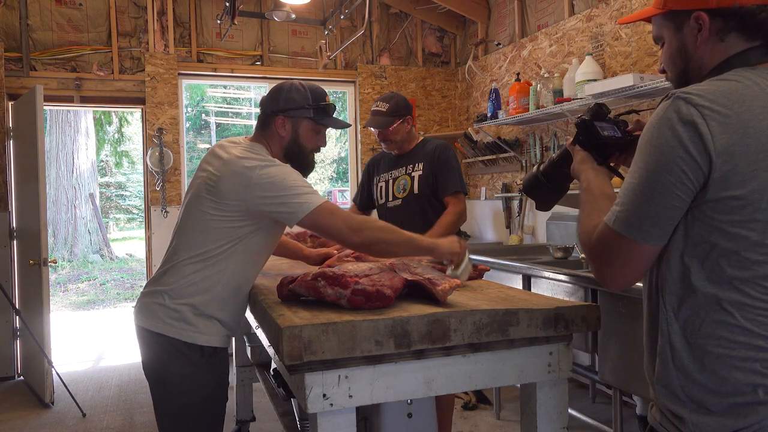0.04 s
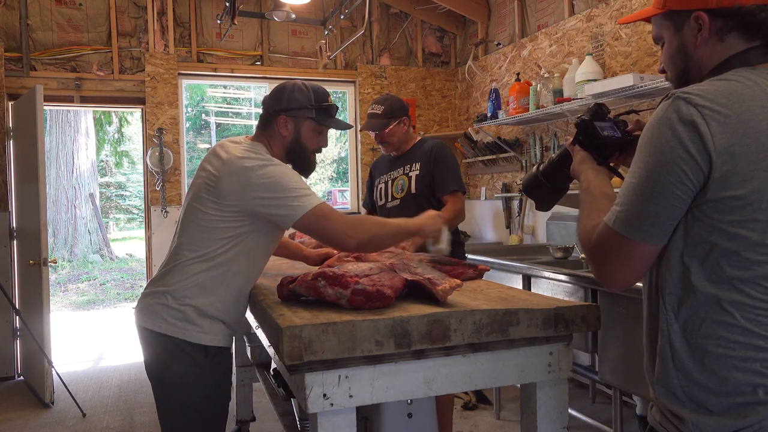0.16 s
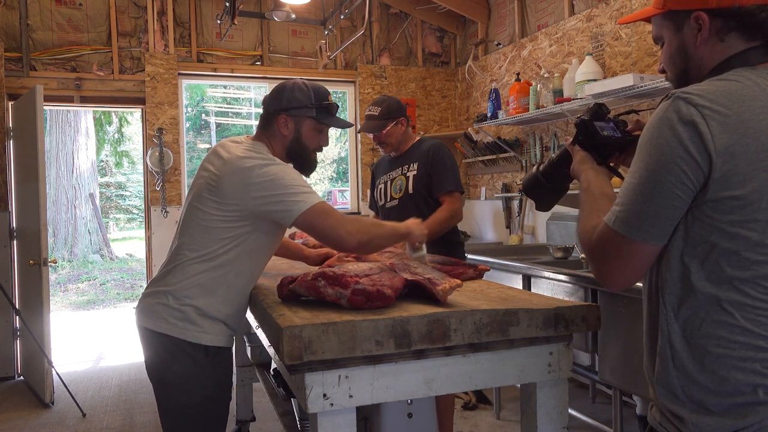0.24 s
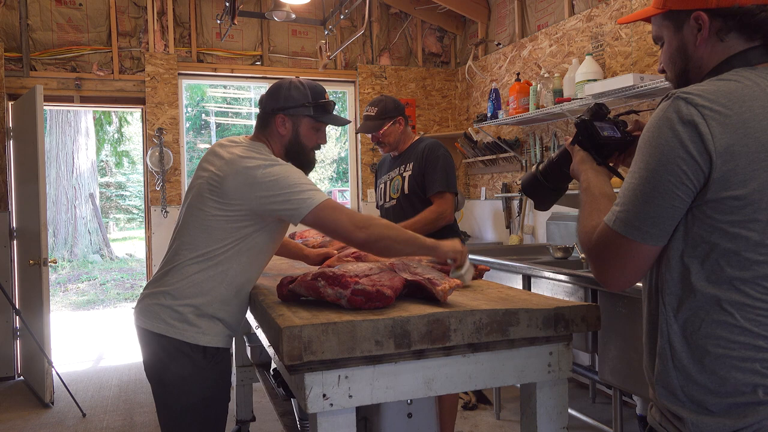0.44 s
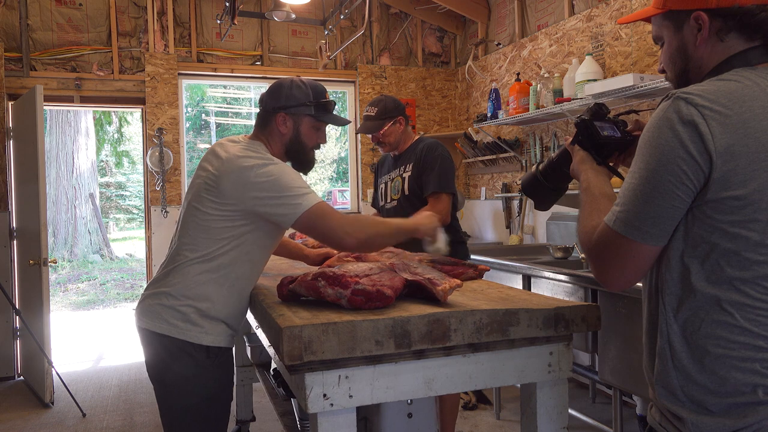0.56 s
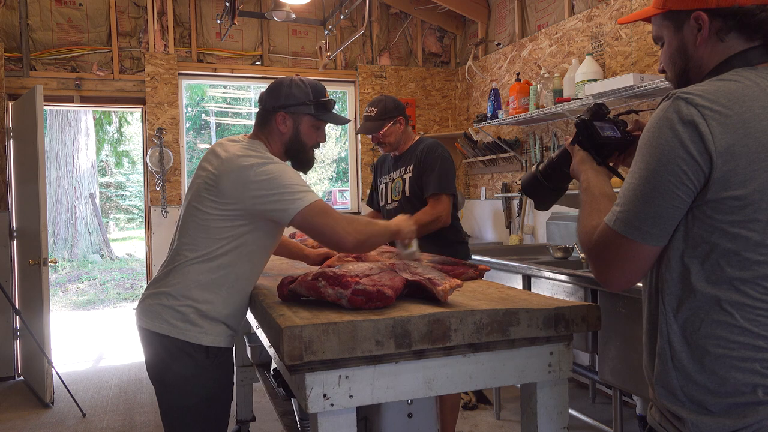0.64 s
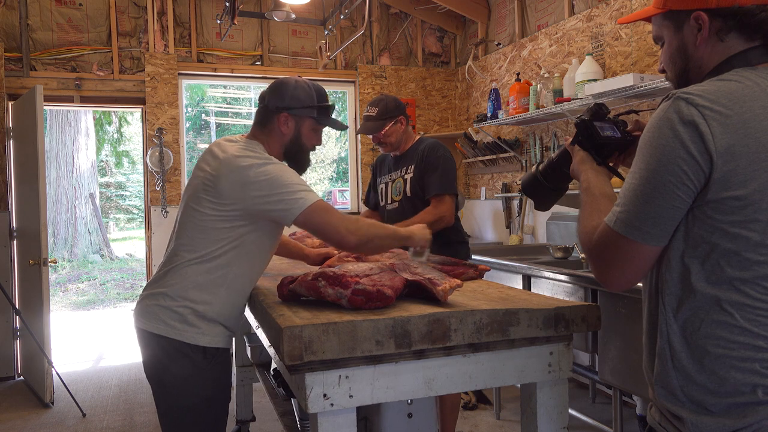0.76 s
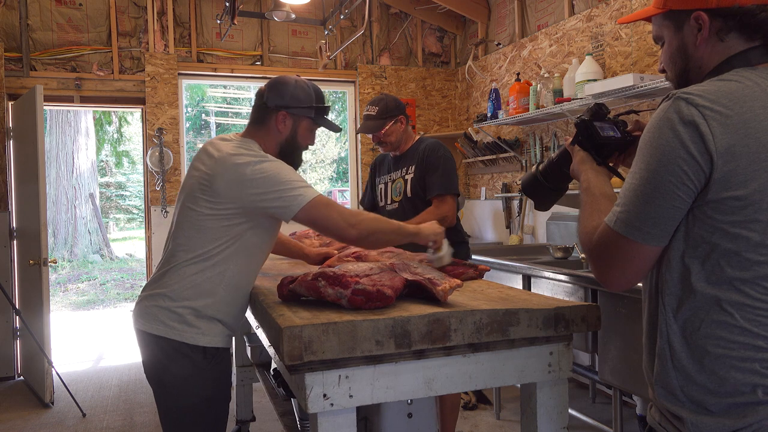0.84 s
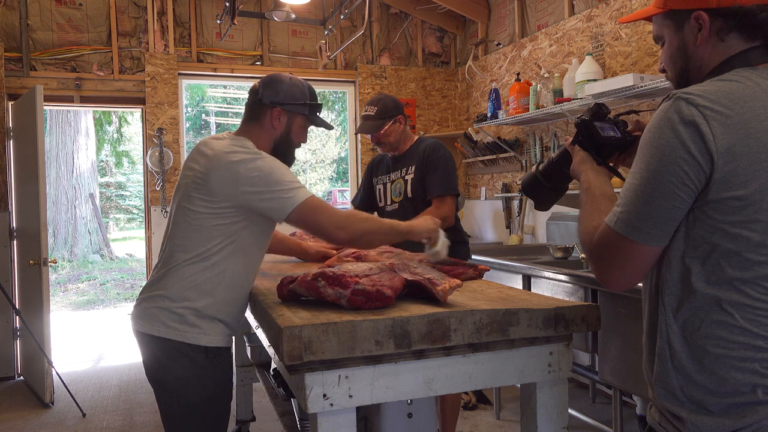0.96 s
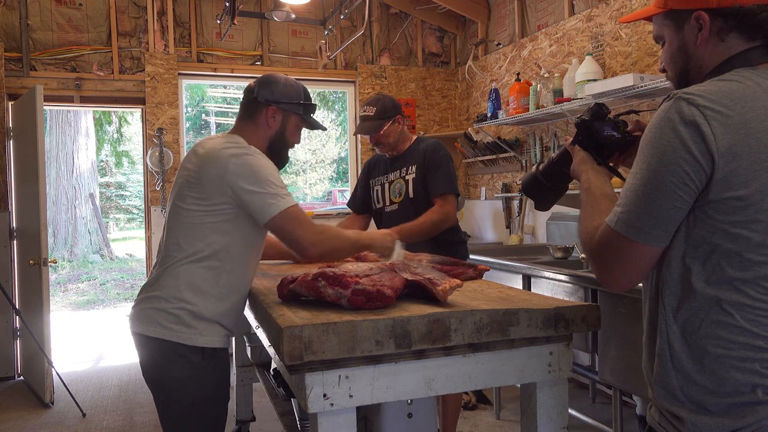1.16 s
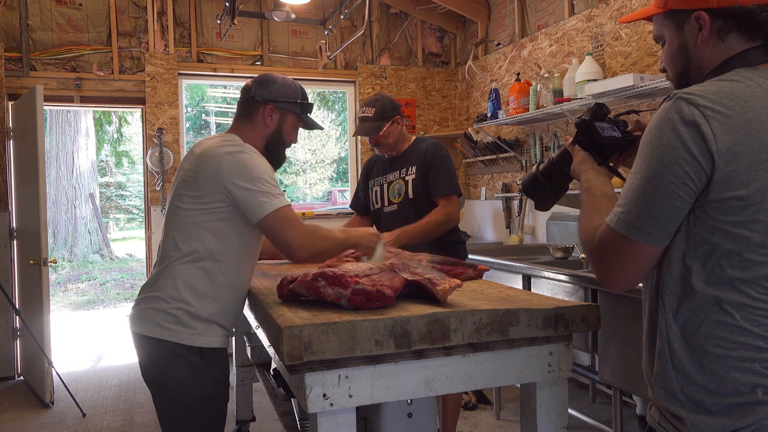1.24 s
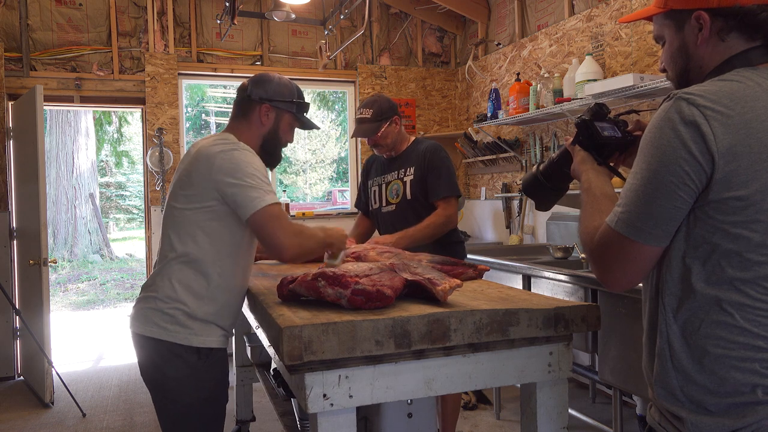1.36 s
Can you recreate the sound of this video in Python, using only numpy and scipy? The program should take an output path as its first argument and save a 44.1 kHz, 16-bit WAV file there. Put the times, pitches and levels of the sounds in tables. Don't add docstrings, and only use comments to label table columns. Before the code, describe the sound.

Hard wooden knocks hit a thick block early, loudest at a third of a second, with softer taps near the end; faint dry bristle strokes between, low cooler hum, small wooden room, microphone a few steps away.

```python
import sys
import numpy as np
from scipy import signal
from scipy.fft import rfft, irfft, next_fast_len
from scipy.io import wavfile
from scipy.ndimage import uniform_filter1d

SR = 44100
rng = np.random.default_rng(int(sys.argv[2]) if len(sys.argv) > 2 else 0)


def gain_from_db(level_db):
    decades = np.asarray(level_db, float) / 20
    return 10 ** decades


def unload_wav(signal):
    wavfile.write(
        sys.argv[1],
        SR,
        np.round(np.clip(np.atleast_2d(signal).T, -1, 1) * 32767).astype(np.int16),
    )


N = 61739
SIZE = next_fast_len(N)


def unit(x):
    return x / np.sqrt(np.mean(x ** 2))


def across(table, hz):
    f, value = np.array(table).T
    return np.interp(np.log(hz + 1), np.log(f), value)


def colour(x, table):
    hz = np.arange(SIZE // 2 + 1) * SR / SIZE
    gain = gain_from_db(across(table, hz)) * np.minimum(hz / table[0][0], 1) ** 2
    return irfft(rfft(x, SIZE) * gain, SIZE)[:N]


def walk(rate_hz):
    hold = int(SR / rate_hz)
    steps = np.repeat(rng.standard_normal(N // hold + 1), hold)
    return 1.7 * uniform_filter1d(uniform_filter1d(steps, hold), hold)[:N]


def bands(count):
    f = np.arange(SIZE // 2 + 1) * SR / SIZE + 1
    out = []
    for hz in 60 * 2 ** (np.arange(count) / 3):
        phase = 2j * np.pi * rng.random(len(f))
        out.append((hz, irfft(np.exp(phase - (3 * np.log2(f / hz)) ** 2), SIZE)[:N]))
    return out


def bristles():
    flicks_per_s, flick_spread_db, slide_db, chatter_db, chatter_hz = 5000, 2, 0.5, 1, 120
    when, sign, size = rng.random(size=(3, N))
    flicks = (when < flicks_per_s / SR) * np.sign(sign - .5) * gain_from_db(-flick_spread_db * np.log(1 - size))
    slide = gain_from_db(slide_db) * rng.standard_normal(N)
    return (unit(flicks) + slide) * gain_from_db(chatter_db * walk(chatter_hz))


# peak t/s, rise/s, fall/s, level/dB, bristle-tip sizzle/dB
STROKES = [(.04, 0.033, 0.037, -56, 1), (.116, .015, .018, -65.5, 3), (.348, .015, .008, -65, -0.5),
           (.44, 0.036, 0.043, -56.5, 3), (.76, .008, 0.027, -71, -6.5), (.808, 0.01, 0.021, -66.5, 3),
           (.855, .022, .03, -65, 0), (0.912, 0.02, 0.028, -60, 5.5), (1.163, .004, 0.0069, -61.5, -3),
           (1.196, 0.014, .02, -65, 0.5), (1.07, 0.06, .05, -76, -12), (1.29, 0.034, 0.037, -73, -1.5),
           (1.35, 0.02, 0.042, -64, 0.5)]
# f/Hz, level/dB
RASP_SPECTRUM = [(900, -16), (1700, -8), (2400, -5.5), (3100, -0.5), (4500, -6), (6000, -13), (7500, -22),
                 (10000, -28.5)]
# f/Hz, level/dB
SIZZLE_SPECTRUM = [(5000, -34), (7300, -25), (9500, -20), (12500, -18.5), (14500, -22.5), (15700, -28.5)]


def brush(t):
    rasp_power, tip_power = 0, 0
    for peak_s, rise_s, fall_s, db, sizzle_db in STROKES:
        swell = np.exp(-((t - peak_s) / rise_s) ** 2 / 2)
        release = 1 / np.cosh((t - peak_s) / fall_s)
        press = gain_from_db(db) * np.where(t < peak_s, swell, release)
        rasp_power = rasp_power + press ** 2
        tip_power = tip_power + (press * gain_from_db(sizzle_db)) ** 2
    shared = bristles()
    scale = np.std(colour(shared, RASP_SPECTRUM))
    rasp = colour(shared * np.sqrt(rasp_power), RASP_SPECTRUM)
    tips = shared + 0.76 * bristles()
    sizzle = colour(tips * np.sqrt(tip_power), SIZZLE_SPECTRUM)
    return (rasp + sizzle) / scale


# f/Hz, level/dB rms
MOTOR_LINES = [(28.8, -59.5), (58.6, -63.5), (118.5, -68.5), (233.5, -62.5), (937, -71.5)]
# t/s, level/dB
SHAFT_SWELL = [(0, -14), (.3, -8.5), (.55, 4.5), (.9, 2), (1.1, -3), (1.4, -7)]
# f/Hz, level/dB per Hz
AIR_SPECTRUM = [(70, -16.5), (200, -8), (450, -10), (1200, -12), (1500, -25), (3500, -30), (6000, -45),
                (15000, -60.5)]


def cooler(t):
    air_db, line_waver_hz, air_waver_hz = -58.5, 9, 6
    swell = np.interp(t, *np.array(SHAFT_SWELL).T)
    wavers = [swell] + [walk(line_waver_hz) for _ in MOTOR_LINES[1:]]
    lines = np.zeros(N)
    for waver_db, (hz, db) in zip(wavers, MOTOR_LINES):
        lines += np.sqrt(2) * gain_from_db(db + waver_db) * np.sin(2 * np.pi * (hz * t + rng.random()))
    air = sum(x * gain_from_db(across(AIR_SPECTRUM, hz) + walk(air_waver_hz)) for hz, x in bands(count=25))
    return lines + gain_from_db(air_db) * unit(air)


# t/s, level/dB, contact/ms, pitch factor
KNOCKS = [
    (.2060, -27, 1.24, 0.91),
    (0.2104, -24, 1.78, .95),
    (.3076, -30, 0.34, 1.0),
    (0.3109, -14.5, 0.55, 1.0),
    (.3153, -15, .8, 1.0),
    (1.032, -43.5, 3.0, 0.876),
    (1.204, -37, 3, 0.9),
    (1.2372, -41.5, 0.87, .88),
    (1.2414, -30.5, 1.58, 1.06),
]
# t/s, level/dB, contact/ms, pitch factor
FURTHER_KNOCKS = [
    (.2225, -33, 1.37, .78),
    (.238, -38, 1.7, .76),
    (1.043, -46, 2.7, .9),
    (1.2115, -43, 2.7, 0.86),
    (1.2545, -38, 1.3, 1.08),
    (1.267, -39.5, 1, 0.86),
    (1.05, -50.5, 2.6, 0.86),
]
# f/Hz, level/dB, t60/s
BLOCK_MODES = [(145, -23, .25), (263, -21, .06), (375.7, -4, 0.046), (471.8, 3, 0.032), (694, -6, 0.037),
               (801, -5, .05), (1070, -1, .06), (1167, -4, .07), (1251, -4.5, 0.054), (1600, -19.5, 0.026),
               (1873, -12.5, .05), (2022, -15, 0.028), (2700, -30, .02), (3280, -22.5, 0.025)]
# f/Hz, level/dB
THUD_SPECTRUM = [(90, -26.5), (200, -11), (330, 0), (650, -1), (1400, -2.5), (2300, -13.5), (4000, -23),
                 (9000, -40.5)]


def knocks(contacts):
    thud_db, thud_t60_s, thud_rise_s, radiates_from_hz = 2, 0.031, 0.00091, 104
    out = np.zeros(N + SR)
    u = np.arange(SR // 4) / SR
    thud_shape = gain_from_db(thud_db - 60 * u / thud_t60_s) * (1 - np.exp(-u / thud_rise_s))
    for at_s, db, contact_ms, pitch in contacts:
        ring = np.zeros(len(u))
        for k, (hz, mode_db, t60_s) in enumerate(BLOCK_MODES):
            ring += (-1) ** k * gain_from_db(mode_db - 60 * u / t60_s) * np.sin(2 * np.pi * hz * pitch * u)
        thud = unit(colour(rng.standard_normal(N), THUD_SPECTRUM))[:len(u)] * thud_shape
        push = u * np.exp(-6000.0 * u / contact_ms)
        i = int(at_s * SR)
        out[i:i + len(u)] += gain_from_db(db) * signal.fftconvolve(ring + thud, push / push.sum())[:len(u)]
    radiation = signal.butter(2, radiates_from_hz, "high", fs=SR, output="sos")
    return signal.sosfilt(radiation, out[:N])


# f/Hz, t60/s
ROOM_T60 = [(125, .45), (400, 0.33), (1000, 0.41), (2500, 0.47), (6000, 0.36), (14000, 0.11)]


def room():
    first_wall_s, build_s = .006, 0.0046
    t = np.maximum(np.arange(N) / SR - first_wall_s, 0)
    tail = sum(x * gain_from_db(-60 * t / across(ROOM_T60, hz)) for hz, x in bands(count=25))
    tail = tail * (1 - np.exp(-t / build_s))
    return tail / np.sqrt(np.sum(tail ** 2))


def scene():
    knock_room_db, brush_room_db = -4, -8.5
    t = np.arange(N) / SR
    hits = knocks(KNOCKS)
    sweep = brush(t)
    shop = room()
    hum = cooler(t)
    hits = hits + knocks(FURTHER_KNOCKS)
    sent = gain_from_db(knock_room_db) * hits + gain_from_db(brush_room_db) * sweep
    wet = signal.fftconvolve(sent, shop)[:N]
    return (hits + sweep + wet + hum)[None]


def low_pass(x):
    return signal.sosfilt(signal.butter(12, 15770, fs=SR, output="sos"), x)


def record(dry):
    return low_pass(dry)


dry = scene()
out = record(dry)
unload_wav(out)
```